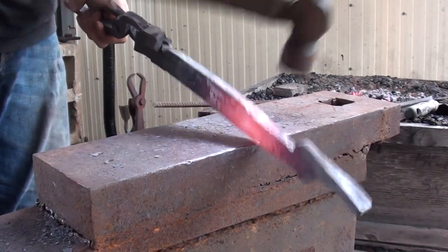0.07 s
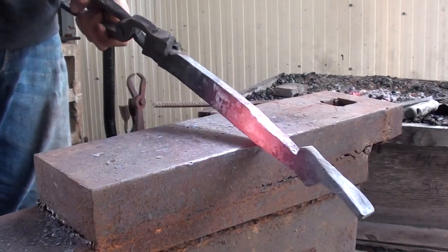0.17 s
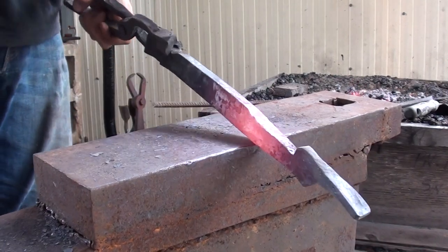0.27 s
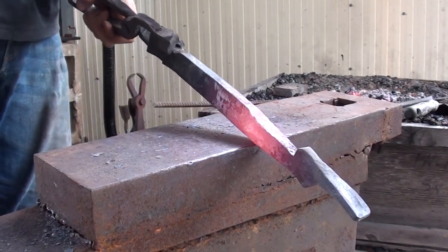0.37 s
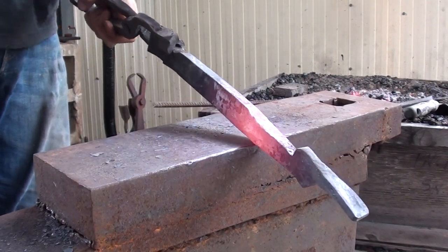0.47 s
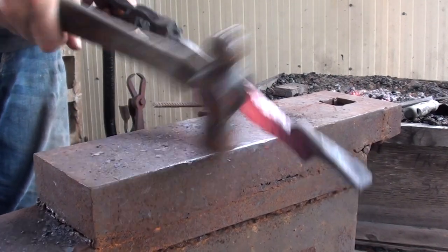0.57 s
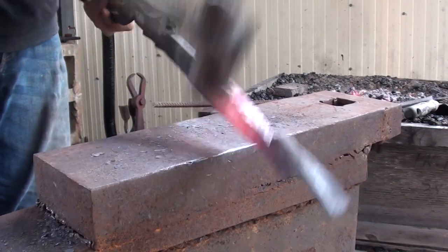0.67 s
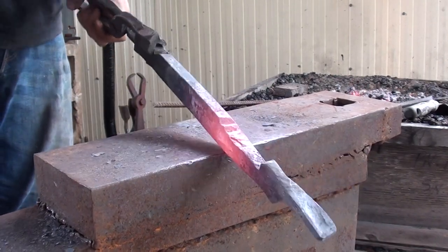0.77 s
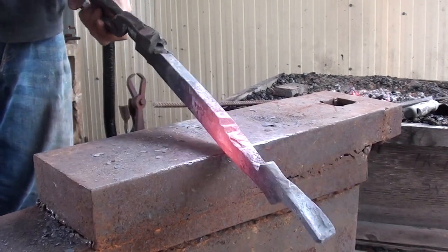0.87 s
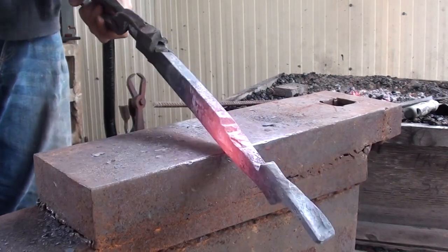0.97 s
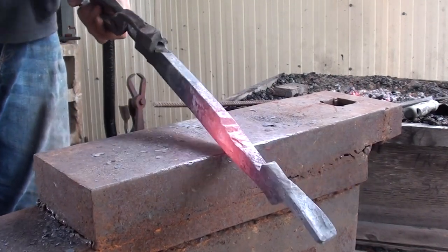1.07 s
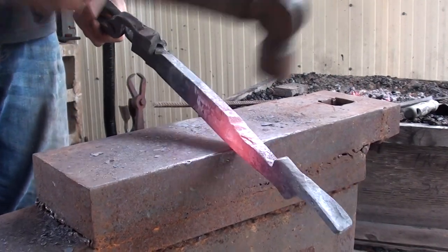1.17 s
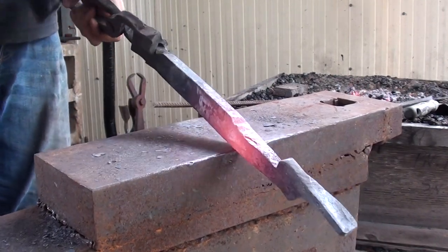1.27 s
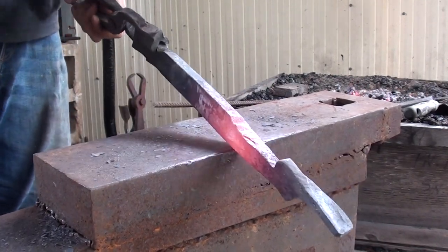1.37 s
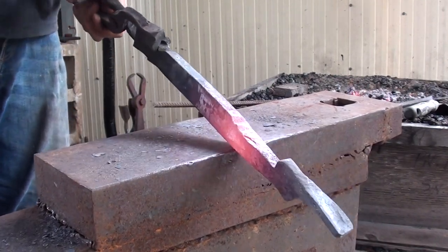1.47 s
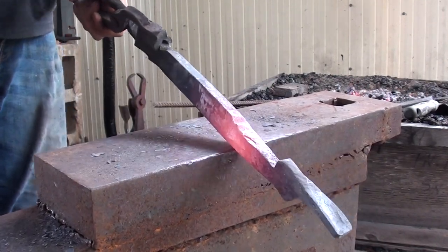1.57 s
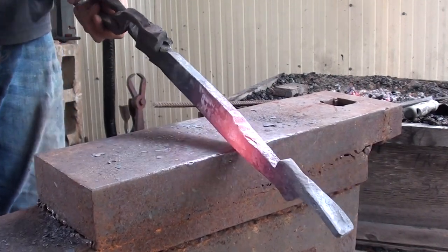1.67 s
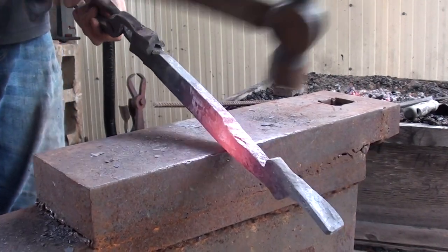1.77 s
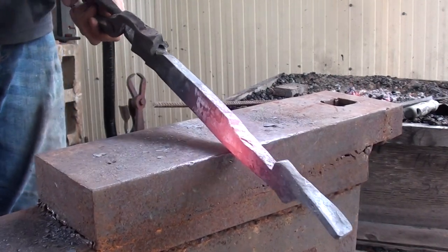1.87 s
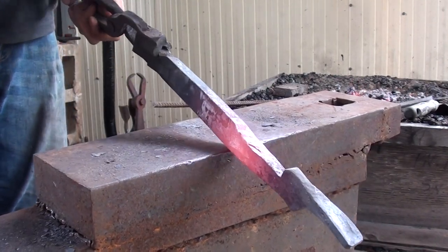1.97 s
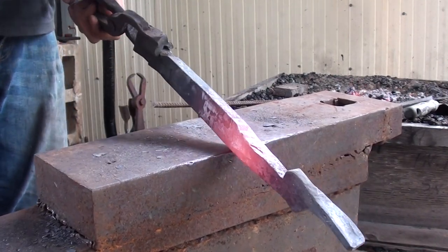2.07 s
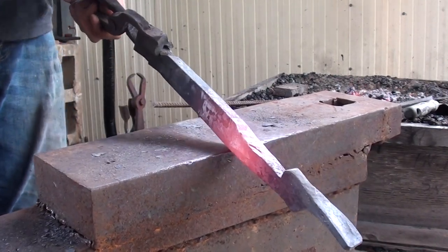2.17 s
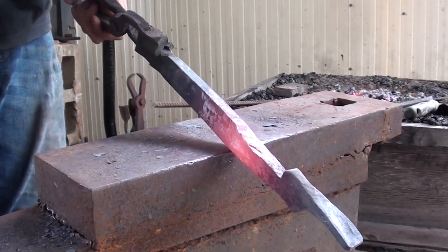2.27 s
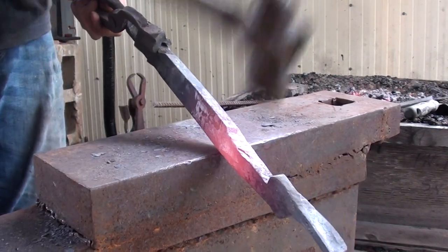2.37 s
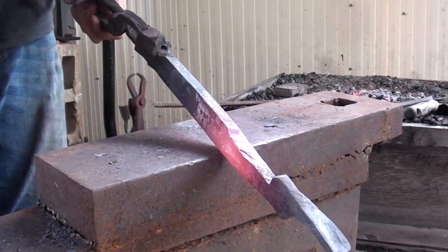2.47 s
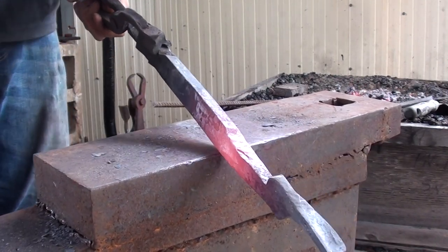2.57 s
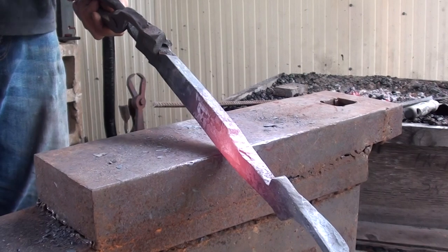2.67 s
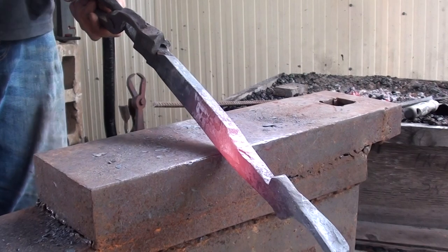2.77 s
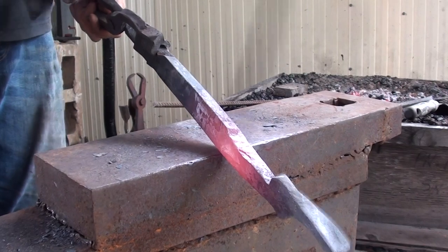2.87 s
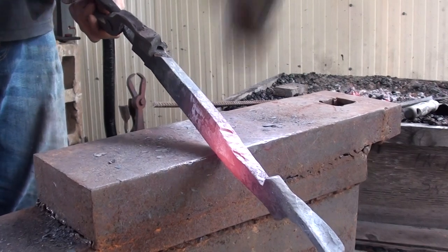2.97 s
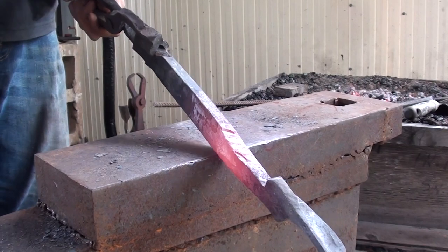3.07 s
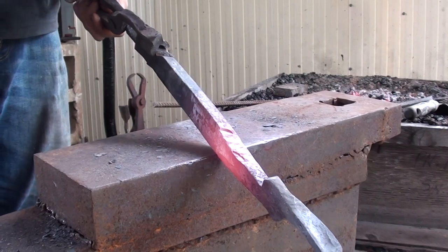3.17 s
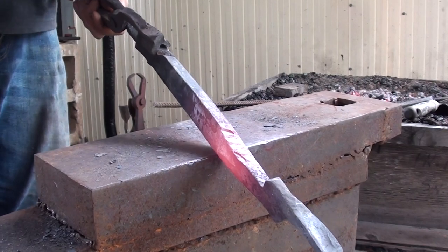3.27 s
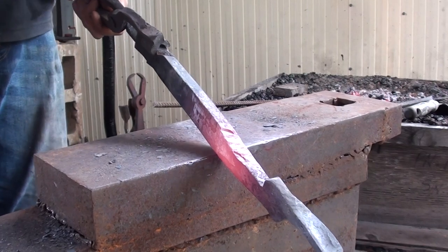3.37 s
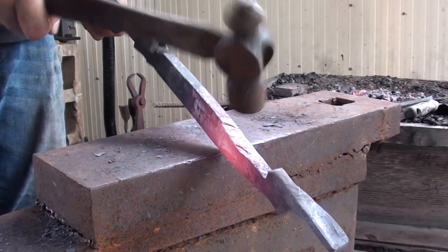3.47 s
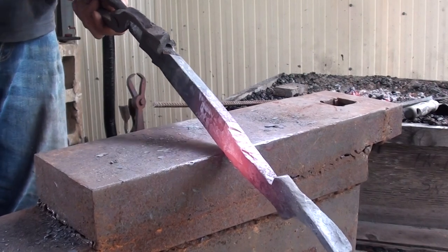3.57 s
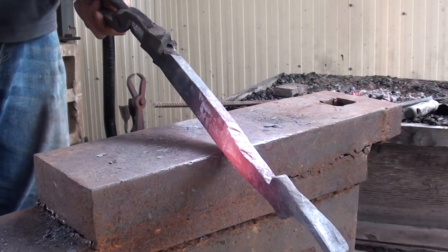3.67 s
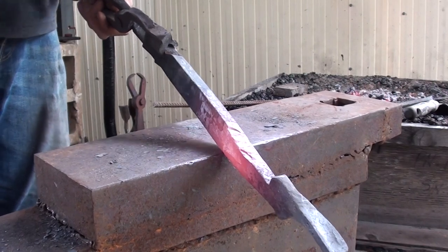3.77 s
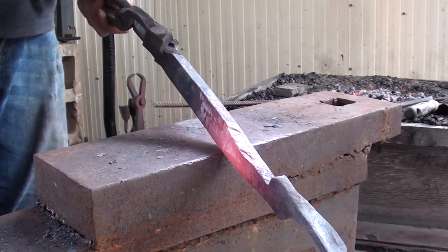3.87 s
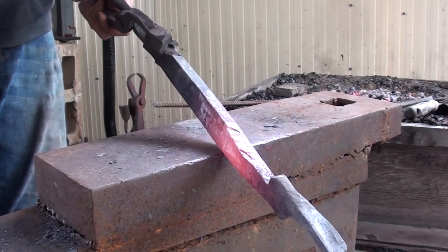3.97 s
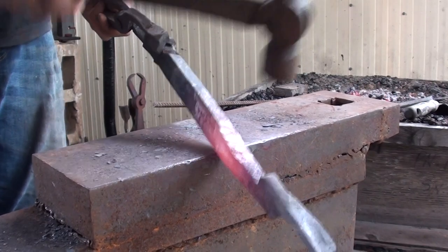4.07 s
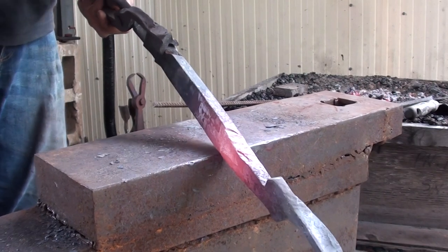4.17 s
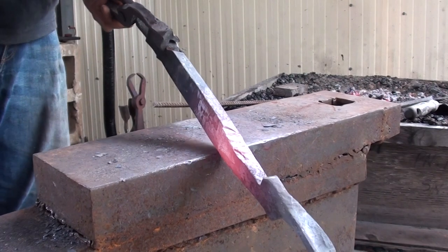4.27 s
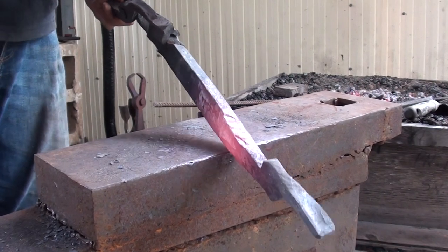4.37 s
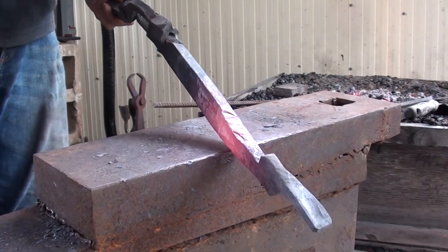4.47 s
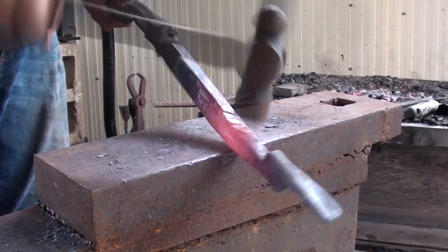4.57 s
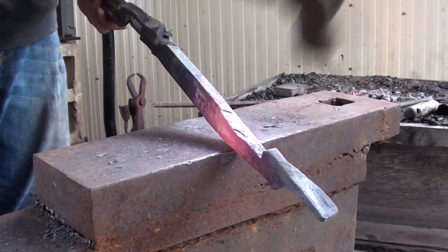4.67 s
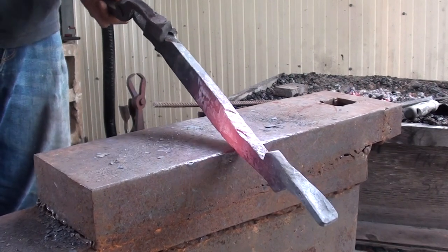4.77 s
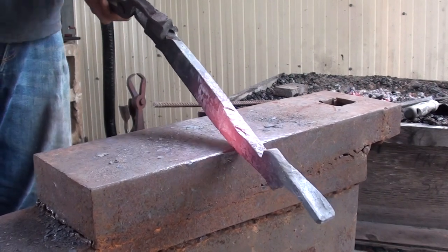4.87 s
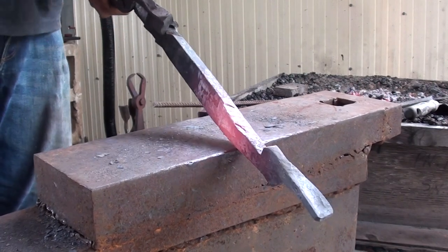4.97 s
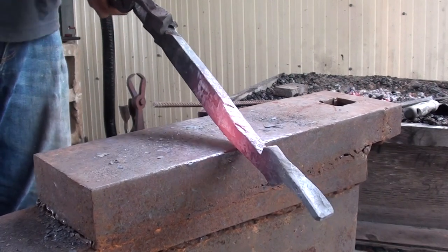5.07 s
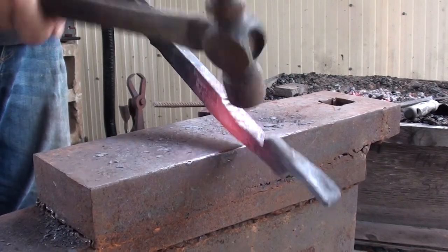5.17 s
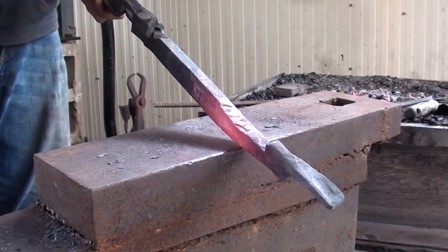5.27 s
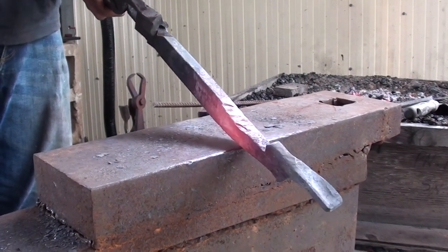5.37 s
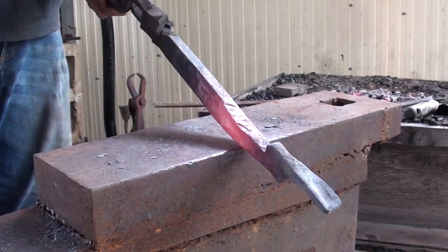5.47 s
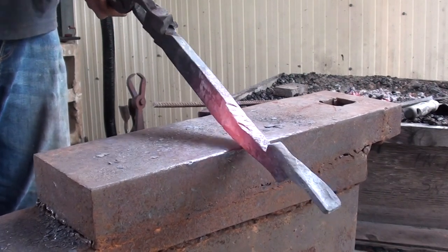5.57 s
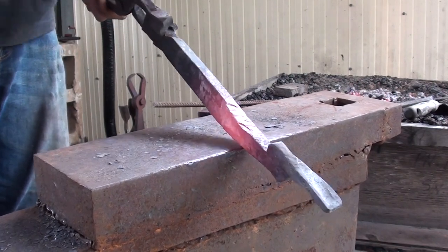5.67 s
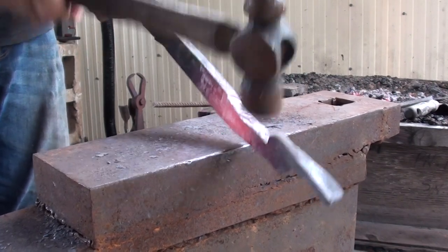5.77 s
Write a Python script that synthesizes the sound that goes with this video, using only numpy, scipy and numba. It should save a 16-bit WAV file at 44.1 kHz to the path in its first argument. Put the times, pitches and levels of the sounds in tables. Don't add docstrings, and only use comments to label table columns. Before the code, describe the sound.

Close up in a sheet-metal forge shed, a hammer hits a red-hot bar on an anvil edge, eleven blows a bit over half a second apart. Each is a hard, dense clank with a short mid-high ring and diffuse room tail. Small ticks of tongs and falling scale fill the gaps over faint air. A nearby small camera flattens the peaks.

```python
import sys
import numpy as np
from scipy import signal
from scipy.fft import rfft, irfft, next_fast_len
from scipy.io import wavfile
from scipy.ndimage import uniform_filter1d, minimum_filter1d
from numba import njit

SR = 44100
rng = np.random.default_rng(int(sys.argv[2]) if len(sys.argv) > 2 else 0)


def wav_record(signal):
    frames = np.transpose(np.atleast_2d(signal))
    bounded = np.clip(frames, -1, 1)
    quanta = np.round(bounded * 32767).astype(np.int16)
    wavfile.write(sys.argv[1], SR, quanta)


def to_linear_factor(level_db):
    exponent = np.asarray(level_db, float) / 20
    return 10 ** exponent


N = 256000

# start in seconds, level in dB, edge from 0 (flat on the hot steel) to 1 (hard on
# the anvil edge), anvil face ring in dB, hammer head ring in dB.
BLOWS = [(0.0356, -7, .45, 7.5, 7), (0.5982, -8, 0.94, -4.5, -28), (1.1744, -8, 0.7, 3.5, 13.5),
         (1.7601, -6.5, 0.65, 3.5, 4), (2.338, -7.5, 0.88, -1, 2.5), (2.9123, -8.5, .15, 2.5, 0.5),
         (3.4832, -6.5, 0.94, 0, -8), (4.0601, -7, 0.89, 5.5, -36), (4.623, -10.5, 0.3, 1.5, -19.5),
         (5.1918, -9, 0.93, 6, 11), (5.7592, -12, .6, 6, 5)]
# start in seconds, level in dB.
BOUNCE = (.7447, -25.5)
BOUNCE_PARTS = dict(crash=-2.5, body=-5, stand=-14, snap=6.5, face=15.5, heel=8, horn=14, head=-22, peen=-36, shed=-8)
# start in seconds, peak in dB, centre in Hz.
TICKS = [(0.3442, -20, 8000), (0.376, -24.5, 2980), (0.4384, -33, 3440), (0.4454, -26.5, 2900),
         (1.0119, -29, 2560), (1.0372, -33, 3090), (1.1092, -32.5, 3150), (1.118, -31, 3590),
         (1.506, -29, 3200), (1.587, -36.5, 3500), (1.9945, -17.5, 2720), (2.0836, -24.5, 2910),
         (2.1054, -35, 3830), (2.1797, -33, 3130), (2.1846, -29, 3850), (2.281, -34, 4030),
         (2.313, -31, 5500), (2.655, -26, 3170), (2.7516, -30, 2870), (2.8559, -30, 2960),
         (3.325, -30, 2840), (3.7818, -33, 3830), (3.809, -33, 3800), (3.899, -32, 3660),
         (4.3585, -39, 3740), (4.3915, -24.5, 4950), (4.4742, -31, 2550), (5.035, -33, 3900),
         (5.512, -30, 3920), (5.6141, -32, 3880)]
# start in seconds, peak in dB,
# centre in Hz, t60 in seconds # # (anything above 0.1 acts as 0.1), width as a share of the centre.
SCUFFS = [
    (0.452, -35, 1020, 0.083, 0.42),
    (.48, -36, 2980, .02, 0.89),
    (2.098, -37, 940, 0.067, 0.29),
    (4.371, -34, 890, 0.12, 0.24),
    (4.41, -25.5, 700, 0.27, 5.7),
    (4.45, -30, 600, 0.23, 4.4),
]

PITCH = dict(body=[1021, 1210, 1632, 1900, 1900, 2006, 2027, 2045, 2135, 2135, 5545], face=[2372, 2468],
         heel=[3840, 3840], horn=[4216], head=[8835, 8835], peen=[10835], stand=[105, 165, 577],
         hum=[576.2, 577.55])
# level in dB, t60 in seconds, rise in seconds.
BODY = [(-12.5, 0.26, 0.0048), (2.5, 0.19, 0.057), (-0.5, 0.19, 0.021), (9, 0.11, 0.0031),
        (-31, 0.25, 0.0033), (-5.5, 0.33, 0.0052), (-5, 0.28, 0.0062), (-9, 0.41, 0.0061), (1, 0.14, 0.003),
        (-24, 0.3, 0.0063), (-17, 0.29, .002)]
# level in dB, t60 in seconds, rise in seconds.
FACE = [(-1, .33, .001), (-14, .22, .001)]
# level in dB, t60 in seconds, rise in seconds.
HEEL = [(0, 0.14, 0.003), (-13, 0.4, 0.0017)]
# level in dB, t60 in seconds, rise in seconds.
HORN = [(-11, .24, .001)]
# level in dB, t60 in seconds, rise in seconds.
HEAD = [(-3, .07, .001), (-17, .26, .005)]
# level in dB, t60 in seconds, rise in seconds.
PEEN = [(-12, .22, .001)]
# level in dB, t60 in seconds, rise in seconds.
STAND = [(-33, 0.44, 0.01), (-23, 0.2, 0.0041), (-13, 0.19, 0.0063)]
# level in dB, t60 in seconds, rise in seconds.
HUM = [(-28, 1.6, .02), (-28, 1.6, .02)]

# frequency in Hz, density in dB per Hz.
CRASH = [(30, -63), (100, -25), (250, -30), (420, -19.5), (800, -12), (1100, -12), (1450, -15),
         (2200, -13.5), (2900, -16), (4700, -15.5), (7500, -12), (10000, -23.5), (14000, -37.5),
         (17000, -82)]
# frequency in Hz, density in dB per Hz.
SNAP = [(300, -30), (1200, -9), (3000, -2), (5500, 1), (9000, -3), (12000, -10), (16500, -25), (18000, -80)]
# frequency in Hz, density in dB per Hz.
AIR = [(15, -38), (40, -13), (105, -7.5), (165, -8), (250, -12.5), (457, -14.5), (979, -10.5),
       (1470, -21.5), (1980, -18), (2900, -25), (6210, -21.5), (10100, -32), (15200, -38), (16500, -53.5)]
# frequency in Hz, t60 in seconds.
SHED = [(100, 0.28), (500, 0.44), (2000, 0.4), (6000, 0.4), (14000, 0.32)]
# frequency in Hz, left-right likeness from 0 to 1.
ALIKE = [(100, .998), (250, .995), (500, .95), (2000, .95), (5000, .93), (9000, .97), (13000, .975)]
# frequency in Hz, left over right in dB.
LEAN = [(250, 0), (600, .9), (1000, 1.6), (2400, 1.4), (4000, .4), (12000, .1)]

SNAP_DB, HEEL_DB, HORN_DB = (-4.5, 13.5), (-21, 0), (-41, 3.5)
BODY_DB, STAND_DB, BAR_DB, STEEL_ROOM_DB = 2, -1, -12, -8
PEEN_DB, PEEN_BEST_DB, PEEN_UNDER, PEEN_OVER = 4, 3, .7, 2.4
BAR_HZ, BAR_SCATTER = [950, 1950, 2200, 3500, 3900, 4250, 5500, 6300], .035
PING_HZ, PING_DB, PING_T60_S = 5470, -9, .02
SAME_HZ = 1000
WAVER = 1.3
TICK_BAND_HZ, TICK_CYCLES, TICK_RISE_S, TICK_TOP_HZ = 7000, 99, .0005, 8100
CRUMBS_PER_S, CRUMB_DB, CRUMB_SPREAD_DB = 5, -45, 3
DRIVE_DB, CEILING_DB, LOW_CUT_HZ, TOP_HZ = 2, -4, 59, 16700


def unit(x):
    return x / np.sqrt(np.mean(x ** 2) + 1e-20)


def along(points, hz):
    f, value = np.transpose(points)
    return np.interp(np.log(hz + 1), np.log(f + 1), value)


def filtered(x, response):
    n = x.shape[-1]
    padded = 2 * next_fast_len(n // 2 + 4096)
    hz = np.fft.rfftfreq(padded, 1 / SR)
    return irfft(rfft(x, padded) * response(hz), padded)[..., :n]


def spread(pair):
    def mixing(hz):
        angle = np.arccos(np.clip(along(ALIKE, hz), -1, 1)) / 2
        return np.array([np.cos(angle), np.sin(angle)])

    mid, side = filtered(pair, mixing)
    return np.array([mid + side, mid - side])


def workshop():
    grains = signal.stft(rng.standard_normal((2, N)), nperseg=512)[2]
    patches = rng.standard_normal(grains.shape[1:])
    patches = uniform_filter1d(uniform_filter1d(patches, 6, 0), 14, 1)
    pair = signal.istft(grains * to_linear_factor(0.7 * unit(patches)), nperseg=512)[1][:, :N]
    air = spread(filtered(pair, lambda hz: to_linear_factor(along(AIR, hz))))
    return to_linear_factor(-53) * unit(air)


def landing(edge, face_db, head_db):
    between = lambda ends: ends[0] + edge * (ends[1] - ends[0])
    off_db = head_db - PEEN_BEST_DB
    peen_db = PEEN_DB - max(PEEN_OVER * off_db, -PEEN_UNDER * off_db)
    return dict(crash=0, shed=0, body=BODY_DB, stand=STAND_DB, snap=between(SNAP_DB), face=face_db,
                heel=between(HEEL_DB), horn=between(HORN_DB), head=head_db, peen=peen_db)


def causal(gain):
    cepstrum = irfft(np.log(np.maximum(gain, 1e-6)))
    half = len(cepstrum) // 2
    fold = np.r_[1, np.full(half - 1, 2), 1, np.zeros(half - 1)]
    return np.exp(rfft(cepstrum * fold))


def tail(n):
    hz, t, z = signal.stft(rng.standard_normal((2, n)), SR, nperseg=256)
    decay = to_linear_factor(-60 * t / along(SHED, hz)[:, None])
    noise = signal.istft(z * decay, SR, nperseg=256)[1][:, :n]
    onset = 1 - np.exp(-np.arange(n) / SR / 0.00036)
    noise = spread(noise * onset)
    return noise / np.linalg.norm(noise[0])


def shed(x):
    return signal.fftconvolve(x[None], tail(SR), axes=1)[:, :len(x)]


def crash_part(share):
    return filtered(tail(SR), lambda hz: causal(np.sqrt(share(hz)) * to_linear_factor(along(CRASH, hz))))


def contact_snap(t):
    burst = rng.standard_normal(SR) * to_linear_factor(-60 * t / 0.032) * (1 - np.exp(-t / 0.00005))
    snap = filtered(burst, lambda hz: causal(to_linear_factor(along(SNAP, hz))))
    snap *= to_linear_factor(3) / np.max(np.abs(snap))
    ping = to_linear_factor(PING_DB - 60 * t / PING_T60_S) * np.sin(2 * np.pi * PING_HZ * t)
    return snap + ping


def ring(part, modes, t):
    hz = np.array(PITCH[part])[:, None]
    db, t60, rise = np.transpose(modes)[:, :, None]
    db = db + rng.standard_normal(db.shape)
    steps = rng.standard_normal((len(hz), len(t) // 64 + 1))
    walk = np.cumsum(steps, 1).repeat(64, 1)[:, :len(t)]
    waver = uniform_filter1d(WAVER * (hz + hz ** 2 / 5000) / SR * walk, size=128, axis=1)
    angle = .17 * rng.standard_normal(db.shape) * np.array([1, -1])[:, None, None]
    envelope = to_linear_factor(db - 60 * t / t60) * (1 - np.exp(-t / rise))
    return np.sum(envelope * np.sin(2 * np.pi * hz * t + waver + angle), 1)


def bar(t):
    draws = rng.uniform([-1, -14, .1], [1, 0, .3], (3 * len(BAR_HZ), 3))
    stray, db, t60 = draws.T[:, :, None]
    hz = np.tile(BAR_HZ, 3)[:, None] * (1 + BAR_SCATTER * stray)
    return np.sum(to_linear_factor(db - 60 * t / t60) * np.sin(2 * np.pi * hz * t), 0)


def hammer():
    out, t = np.zeros((2, N + 2 * SR)), np.arange(SR) / SR
    singers = dict(face=FACE, heel=HEEL, horn=HORN, head=HEAD, peen=PEEN)
    fresh = lambda hz: hz ** 2 / (hz ** 2 + SAME_HZ ** 2)
    boom = crash_part(lambda hz: 1 - fresh(hz))
    contacts = [(s, db, landing(*how)) for s, db, *how in BLOWS]
    contacts.append((*BOUNCE, BOUNCE_PARTS))
    for s, db, part_db in sorted(contacts, key=lambda contact: contact[0]):
        crash = boom + crash_part(fresh)
        snap = contact_snap(t)
        steel = to_linear_factor(part_db["body"]) * ring("body", BODY, t)
        steel += to_linear_factor(part_db["stand"]) * ring("stand", STAND, t)
        for part, modes in singers.items():
            steel += to_linear_factor(part_db[part]) * ring(part, modes, t)
        steel += to_linear_factor(part_db["crash"] + BAR_DB) * bar(t)
        hum = to_linear_factor(part_db["stand"] - 1) * ring("hum", HUM, t)
        room = to_linear_factor(STEEL_ROOM_DB + part_db["shed"]) * shed(steel[0])
        sound = to_linear_factor(part_db["crash"] + 47.5) * crash + to_linear_factor(part_db["snap"]) * snap
        sound += steel + room + hum
        out[:, round(s * SR):][:, :SR] += to_linear_factor(db + DRIVE_DB) * sound
    return out[:, :N]


def grit(hz, t60, width, t):
    clumps = to_linear_factor(4 * rng.standard_normal(len(t) // 32 + 1)).repeat(32)[:len(t)]
    envelope = to_linear_factor(-60 * t / np.clip(t60, .004, .1)) * (1 - np.exp(-t / TICK_RISE_S))
    noise = clumps * rng.standard_normal(len(t)) * envelope

    def response(f):
        damping = 1j * f * width * hz
        band = damping / (hz * hz - f * f + damping)
        return band ** 3 / (1 + (f / max(TICK_TOP_HZ, 2 * hz)) ** 8)

    click = filtered(noise, response)
    return click / np.max(np.abs(click))


def ticks():
    out, t = np.zeros(N + SR), np.arange(SR // 8) / SR
    lowest, highest = [0, -CRUMB_SPREAD_DB, 3000], [N / SR, CRUMB_SPREAD_DB, 6000]
    crumbs = rng.uniform(lowest, highest, (round(CRUMBS_PER_S * N / SR), 3))
    small = TICKS + list(crumbs + [0, CRUMB_DB, 0])
    clicks = [(s, db, hz, TICK_CYCLES / hz, TICK_BAND_HZ / hz) for s, db, hz in small]
    for s, db, hz, t60, width in SCUFFS + clicks:
        out[round(s * SR):][:len(t)] += to_linear_factor(db - 7) * grit(hz, t60, width, t)
    return out[:N] + to_linear_factor(-11) * shed(out[:N])


def scene():
    return workshop() + hammer() + ticks()


@njit
def follow(level, fall):
    out, held = np.empty_like(level), 0.0
    for i in range(len(level)):
        held = max(level[i], held * fall)
        out[i] = held
    return out


def limiter(x, ceiling_db, release_db, slope):
    ahead = -minimum_filter1d(-np.max(np.abs(x), 0), size=41)
    peak = follow(ahead, to_linear_factor(-release_db / SR))
    over = np.maximum(peak / to_linear_factor(ceiling_db), 1)
    return x * uniform_filter1d(over ** (slope - 1), size=31)


def roll_off(x):
    return signal.sosfilt(signal.butter(12, 16890, fs=SR, output="sos"), x)


def record(dry):
    placed = filtered(dry, lambda hz: to_linear_factor(np.outer([1, -1], along(LEAN, hz)) / 2))
    held = limiter(placed, CEILING_DB, release_db=281, slope=0.13)
    mix = filtered(held, lambda hz: (hz < TOP_HZ) * 1j * hz / (LOW_CUT_HZ + 1j * hz))
    return roll_off(mix)


dry = scene()
out = record(dry)
wav_record(out)
```